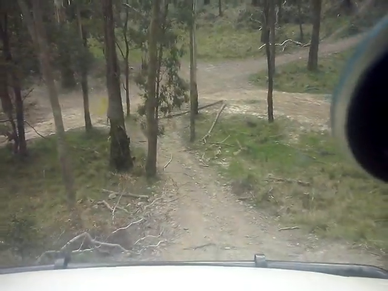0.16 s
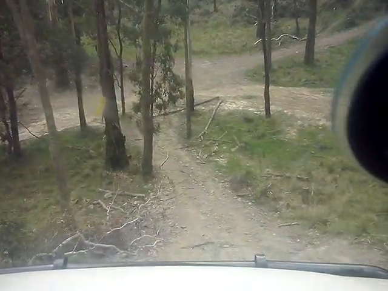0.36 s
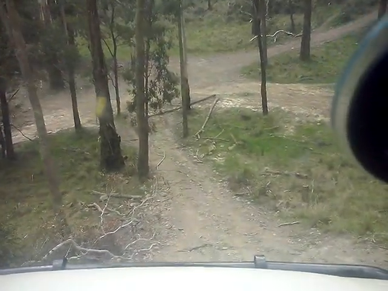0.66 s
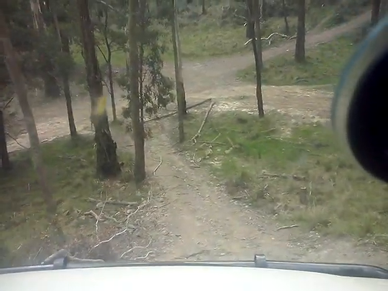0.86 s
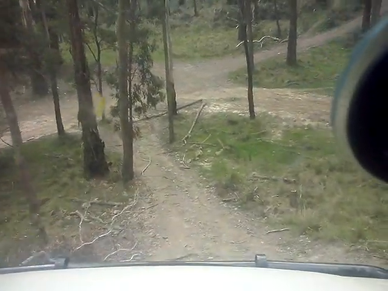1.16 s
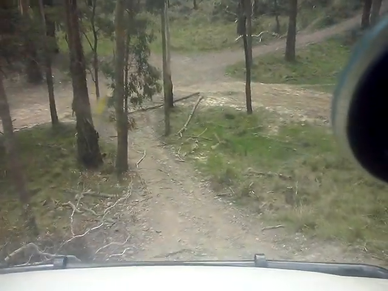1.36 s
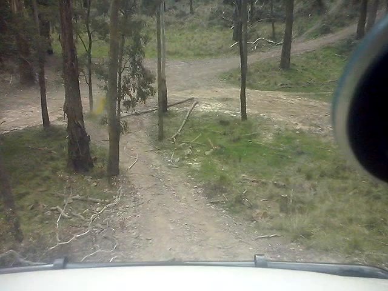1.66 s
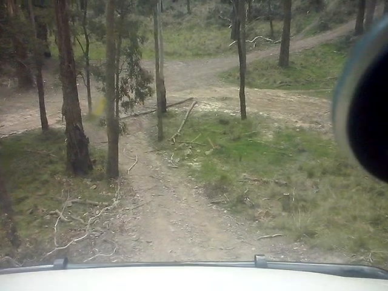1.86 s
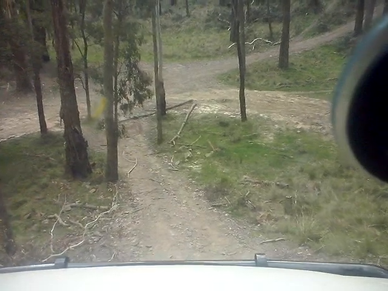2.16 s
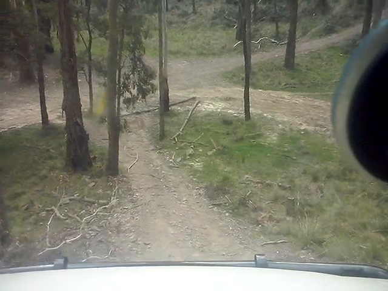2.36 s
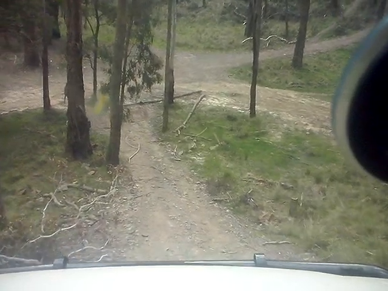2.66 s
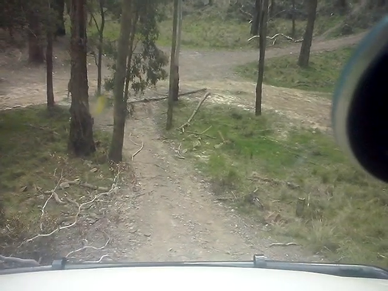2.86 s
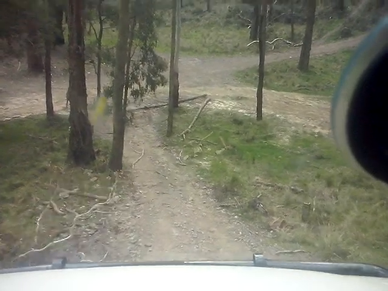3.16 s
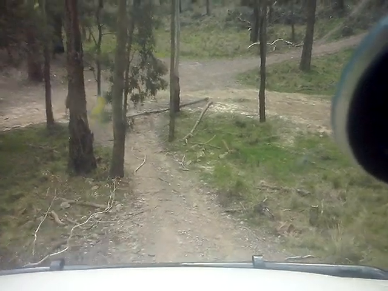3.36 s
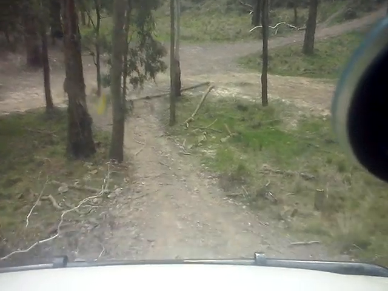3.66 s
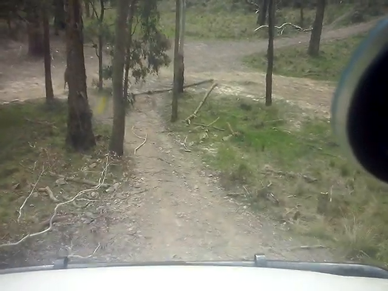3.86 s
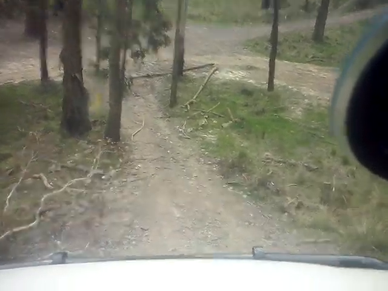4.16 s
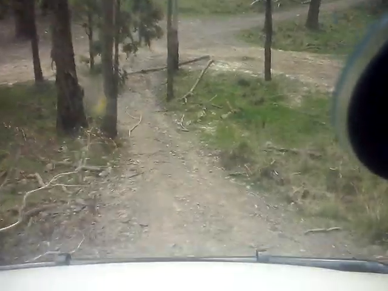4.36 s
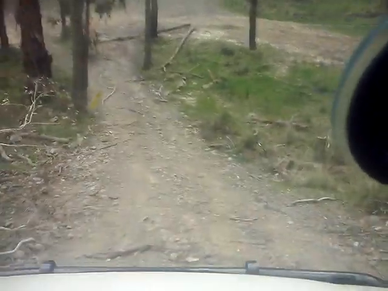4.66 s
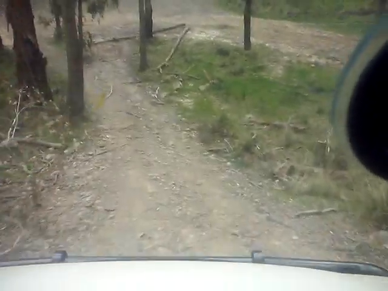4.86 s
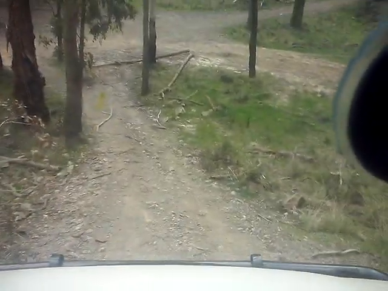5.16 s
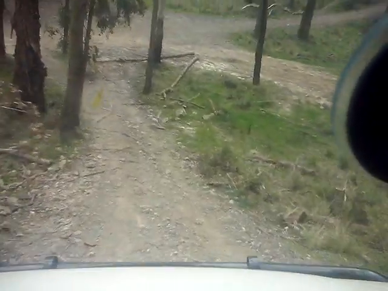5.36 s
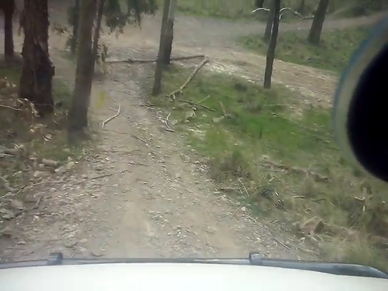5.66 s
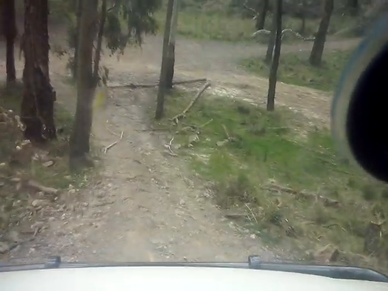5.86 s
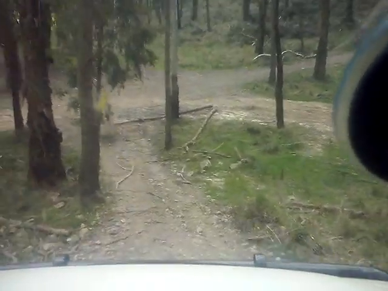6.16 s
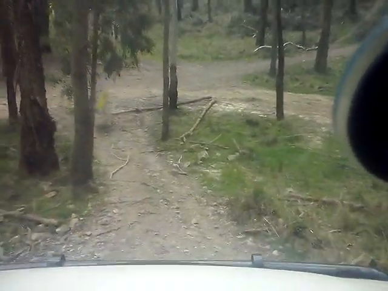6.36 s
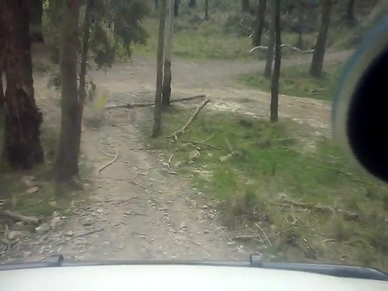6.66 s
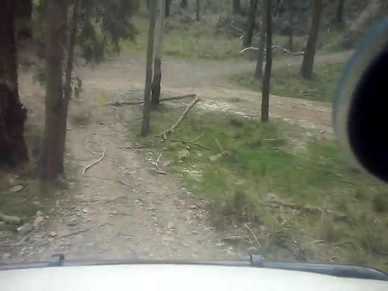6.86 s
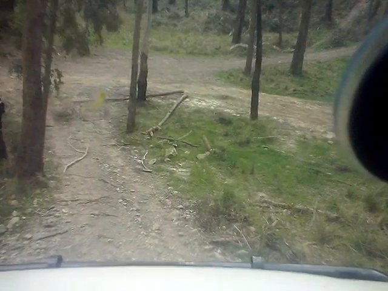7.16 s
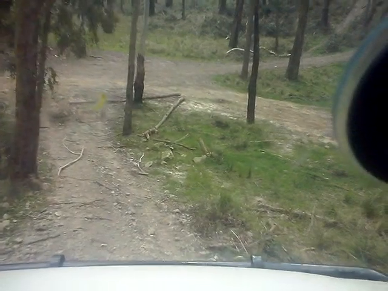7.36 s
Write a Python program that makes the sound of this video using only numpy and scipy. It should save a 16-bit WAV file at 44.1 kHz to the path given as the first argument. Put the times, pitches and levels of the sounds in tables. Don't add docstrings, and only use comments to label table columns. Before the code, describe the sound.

Inside a closed vehicle cabin, tyres creep over gravel with trim creaks and faint engine hum, then dry sticks snap loudly and stones crunch.

```python
import sys
import numpy as np
from scipy import signal
from scipy.fft import rfft, irfft, next_fast_len
from scipy.io import wavfile
from scipy.ndimage import map_coordinates

SR = 44100
rng = np.random.default_rng(int(sys.argv[2]) if len(sys.argv) > 2 else 0)


def store_wav(level_fs):
    pcm = np.round(np.clip(np.atleast_2d(level_fs), -1, 1) * 32767)
    wavfile.write(sys.argv[1], SR, pcm.T.astype(np.int16))


def linear_from_db(decibels):
    return 10 ** (np.asarray(decibels, float) / 20)


N = 330750


def unit(x):
    return x / np.sqrt(np.mean(x ** 2) + 1e-20)


def along(points, hz):
    f, value = np.transpose(points)
    return np.interp(np.log(hz + 1), np.log(f + 1), value)


def curves(rows):
    s, *columns = np.transpose(rows)
    return [np.interp(np.arange(N) / SR, s, column) for column in columns]


def wobble(rate):
    knots = rng.standard_normal(int(N * rate / SR) + 4)
    return map_coordinates(knots, [np.arange(N) * rate / SR])


def filtered(x, response):
    m = next_fast_len(N + SR // 2)
    return irfft(rfft(x, m) * response(np.fft.rfftfreq(m, 1 / SR)), m)[..., :N]


def coloured(x, spectrum):
    closed = [(0.76, -120)] + spectrum + [(SR / 2, -120)]
    return unit(filtered(x, lambda hz: linear_from_db(along(closed, hz))))


def modes(peaks):
    def response(f):
        total = 0
        for k, (centre, width, db) in enumerate(peaks):
            damping = 1j * f * width
            total = total + (-1) ** k * linear_from_db(db) * damping / (centre * centre - f * f + damping)
        return total
    return response


def add(track, s, sound):
    part = track[max(round(s * SR), 0):][:len(sound)]
    part += sound[:len(part)]


def swells(rows):
    power = np.zeros(N)
    for s, length, db in rows:
        t = np.arange(max(-3 * length, -s), 3 * length, 1 / SR)
        add(power, s + t[0], linear_from_db(2 * db) * np.exp(-2 * (2 * t / length) ** 2))
    return power


def heaped(base_db, rows, lean):
    tilted = [(s, length, db + lean * tilt) for s, length, db, tilt in rows]
    return 10 * np.log10(linear_from_db(2 * base_db) + swells(tilted))


def grains(chance, spread_db, t60):
    size_db = spread_db * np.minimum(rng.exponential(size=N), 3)
    sizes = (rng.random(N) < chance) * linear_from_db(size_db)
    puff = linear_from_db(-60 * np.arange(SR // 20) / SR / t60)
    return unit(signal.fftconvolve(sizes, puff)[:N] * rng.standard_normal(N))


# t/s, level/dB
ROLL = [(0, -49), (.3, -44.5), (.45, -51.5), (.9, -53.5), (1.4, -52.5), (1.8, -48.5), (2.3, -51),
        (3.15, -51.5), (3.5, -51.5), (4.15, -47), (4.4, -42), (5.1, -37), (5.5, -40.5), (5.85, -43.5),
        (6.2, -40.5), (6.5, -41.5), (6.62, -48), (6.85, -53.5), (7.5, -47)]
# centre t/s, length/s, level/dB, coarseness/dB (big stones crunch, small hiss)
PATCHES = [(.06, 0.32, -45, -17), (0.198, 0.11, -37.5, -4.5), (.31, 0.026, -40.5, -8), (1.9, 0.16, -49, -3),
           (3.29, 0.13, -46.5, 7), (3.63, 0.26, -43, -0.5), (3.76, 0.13, -45.5, 0), (4.02, 0.14, -64, -7),
           (4.45, 0.14, -33, 2.5), (4.54, 0.13, -37.5, -6), (4.622, 0.032, -29.5, 2),
           (4.7, 0.063, -29.5, -7.5), (4.788, 0.14, -27, -1), (4.956, 0.14, -27, 4), (5.22, 0.26, -41, 4),
           (5.299, 0.12, -31.5, -3), (5.381, 0.086, -33.5, -13), (5.7, 0.12, -33.5, -5),
           (5.94, 0.22, -40, -4), (6.273, 0.13, -30, -5), (6.421, 0.16, -29.5, -2), (7.419, 0.047, -41, -7)]
# centre t/s, level/dB, depth/dB (deep ones rumble, shallow ones drum)
RUTS = [(.15, -43, -5), (1.6, -46, 0), (2, -45.5, 6), (2.6, -49, -14), (3.31, -36.5, 5), (3.37, -54, 8),
        (3.63, -38.5, 13.5), (3.76, -41, -7), (4.02, -39.5, 10), (4.33, -34, 3), (4.44, -38, 10),
        (4.65, -32, -2), (4.79, -27, 4), (4.96, -29, -12.5), (5.27, -36, 7), (5.38, -36, -15),
        (5.7, -40, 0), (6.07, -42, 14), (6.27, -34, -4), (6.42, -36, -0.5), (7.42, -46.5, -8)]
# f/Hz, level/dB
GRIT = [(2400, -5.5), (3200, -3), (4200, -1.5), (5500, 0.5), (6600, 2.5), (9000, -6)]
# f/Hz, level/dB
CRUNCH = [(600, -16.5), (900, -5.5), (1450, 1), (2000, -5), (3000, -7), (4000, -17)]
# f/Hz, level/dB
BODY = [(130, -8), (190, -1), (230, -1.5), (330, -3.5), (550, -8), (900, -15), (1300, -15.5)]
# f/Hz, level/dB
RUMBLE = [(20, -45), (36, -19), (50, -0.5), (80, -2), (125, -1), (170, -21)]
CRUNCH_DB, BODY_DB, RUMBLE_DB = 1, 1.96, 0.5
RUT_S = 0.21


def tyres():
    roll_db, = curves(ROLL)
    ruts = [(s, RUT_S, db, depth) for s, db, depth in RUTS]
    grit_db = heaped(roll_db, PATCHES, lean=-0.62)
    crunch_db = heaped(roll_db + CRUNCH_DB, PATCHES, lean=0.71)
    body_db = heaped(roll_db + BODY_DB, ruts, lean=-0.3)
    rumble_db = heaped(roll_db + RUMBLE_DB, ruts, lean=0.26)
    stones = grains(chance=300 / SR, spread_db=2.5, t60=0.014)
    stones = stones * np.clip((roll_db + 65.5) / 16, .3, 1)
    hiss = rng.standard_normal((4, N))
    shared = 1.3 * wobble(35)
    grit = linear_from_db(grit_db + shared + 0.32 * wobble(4.7)) * coloured(0.99 * stones + hiss[0], GRIT)
    lumps = coloured(0.5 * stones + hiss[1], CRUNCH) + 0.59 * pebbles(count=800, cycles=106, spread_db=8)
    crunch = linear_from_db(crunch_db - 1.5 + shared + 1.1 * wobble(18)) * lumps
    body = linear_from_db(body_db + 0.54 * shared + 1.13 * wobble(13)) * coloured(hiss[2], BODY)
    rumble_gain = linear_from_db(rumble_db - 2.5 + 0.21 * shared + 2.05 * wobble(15.0))
    return grit + crunch + body + rumble_gain * coloured(hiss[3], RUMBLE)


def pebbles(count, cycles, spread_db):
    out, t = np.zeros(N), np.arange(SR // 40) / SR
    for when, pitch, size in rng.random((count, 3)):
        hz = 600 * 7 ** pitch
        envelope = linear_from_db(spread_db * size - 60 * t * hz / cycles) * (1 - np.exp(-t / 0.00042))
        add(out, when * N / SR, envelope * np.sin(2 * np.pi * hz * t))
    return unit(out)


# t/s, peak level/dB, ring f/Hz
CRACKS = [
    (4.325, 3, 5580),
    (4.3819, 1, 4950),
    (4.5931, 1, 5540),
    (4.7259, 2, 5310),
    (6.2041, .8, 5650),
    (6.2509, .5, 5250),
    (6.3091, 0, 5410),
]
# t/s, peak level/dB, ring f/Hz
SNAPS = [(3.2261, -13, 6820), (3.5366, -14.5, 7070), (3.9382, -22, 3480), (4.0797, -20, 3767),
         (4.1903, -7.5, 5700), (4.6299, -7.5, 5330), (4.6616, -4, 6220), (4.687, -15, 5280),
         (4.781, -5.5, 5880), (5.0185, -2.5, 6730), (5.1178, -15.5, 6660), (5.144, -12.5, 5570),
         (5.2238, -5, 3930), (5.2602, -10.5, 3700), (5.3148, -16, 3340), (5.3842, -6.5, 3000),
         (5.548, -7, 6370), (6.1832, -5.5, 5050), (6.2725, -15, 6190), (6.4815, -11, 6770),
         (7.2461, -15, 6220)]
# t/s, peak level/dB, ring f/Hz
CHIPS = [(1.5656, -17.5, 5970), (1.7919, -3, 6700), (2.535, -20, 3870), (2.586, -17.5, 3420),
         (3.5598, -16, 6900), (3.9801, -27, 5750), (4.3617, -4.5, 6070), (4.4113, -8.5, 6330),
         (4.6458, -7.5, 6470), (4.7394, -11.5, 3600), (4.8085, -5, 5180), (4.8682, -3.5, 6760),
         (5.0515, -17, 6100), (5.1568, -13, 6193), (5.925, -7, 6100), (6.51, -23, 4900), (7.388, -10, 4600)]
# t/s, peak level/dB, ring f/Hz, dull click level/dB
KNOCKS = [(0.5053, -33, 4540, -7), (1.6385, -24.5, 6470, -6), (1.756, -39, 3170, -3),
          (2.798, -24.5, 3950, -1.5), (3.588, -9, 5680, -1), (3.609, -16.5, 3540, 1.5),
          (3.6296, -22, 5190, 1), (4.062, -20, 3340, -5), (4.1901, -16.5, 3550, 8), (4.3021, -8, 6470, 2),
          (4.4709, -17.5, 5190, -16), (4.501, -21.5, 4000, 3.5), (4.764, -5.5, 6100, -15),
          (4.955, -22, 3100, -3), (4.977, -9, 5100, -2.5), (5.4514, -17, 5088, 2), (5.774, -23.5, 5294, 0),
          (5.8181, -41, 2960, 15.5), (6.068, -32, 5280, -3), (6.298, -18.5, 5130, 3.5),
          (6.425, -17.5, 6310, -5)]
# t/s, peak level/dB, ring f/Hz
TICKS = [(1.1141, -30, 6300), (1.1962, -29.5, 6490), (1.588, -18, 5800), (1.6125, -22, 3130),
         (1.6406, -20, 2860), (1.7564, -30, 2870), (1.8207, -18, 6070), (1.896, -26.5, 3180),
         (1.9074, -26, 4700), (1.9439, -24, 5430), (4.3145, -21, 5200), (4.3575, -21, 6000),
         (4.7955, -17, 4970), (3.437, -32, 6640), (2.1377, -25, 5900), (2.1716, -28, 6440),
         (2.3446, -24.5, 6670), (2.4923, -44, 4260), (3.4833, -27.5, 3870), (4.0221, -28, 2710),
         (4.0456, -28, 6330), (4.1791, -32, 5750), (4.3413, -12, 5120), (4.4004, -33, 5260),
         (4.4428, -3, 5700), (4.4598, -12, 5200), (4.6638, -10, 5860), (4.6917, -2.5, 5100),
         (4.7054, -17, 5430), (4.7333, -10, 5170), (4.8195, -10, 6660), (4.8743, -6.5, 6330),
         (4.9876, -15, 6750), (5.0314, -4, 5620), (5.065, -13, 6330), (5.0762, -20, 5800),
         (5.1138, -11, 5470), (5.1198, -16, 6400), (5.1523, -18, 6150), (5.177, -13.5, 6290),
         (5.1824, -23, 5900), (5.2473, -22, 4260), (5.3202, -15, 3340), (5.3353, -23, 5350),
         (5.3515, -13, 2714), (5.3701, -14.5, 6100), (5.3901, -5.5, 2940), (5.3974, -14, 6440),
         (5.4067, -15, 3660), (5.4534, -11.5, 5150), (5.907, -32, 5970), (5.9801, -3, 4260),
         (5.9898, -13.5, 3850), (6.2582, -17, 4900), (6.4573, -7, 6200), (7.0197, -31, 6140),
         (7.0896, -33, 6560), (7.2534, -10.5, 6150), (7.3688, -19, 6680), (7.415, -20, 5340)]
# t/s, peak level/dB, ring f/Hz
SPLINTERS = [(.3702, -29, 6700), (.445, -32, 5800), (.939, -38, 3933), (1.431, -27, 5470),
             (1.5397, -29, 7040), (1.99, -23, 3220), (2.6137, -19.5, 5440), (4.233, -22.5, 3640),
             (4.842, -19, 3330), (5.8419, -26, 3810), (5.8663, -28, 3620), (7.151, -27, 6440),
             (7.3589, -27, 6560)]
# t/s, peak level/dB, f/Hz
CLICKS = [
    (2.0799, -15, 3840),
    (2.0923, -11, 4100),
    (2.1014, -26, 5240),
    (2.117, -9, 3850),
]
CHIP_DULL_DB, SNAP_DULL_DB, TWIG_DULL_DB = -40, -12, -7.5
TICK_DULL_DB, SLIP_DULL_DB = -8, -12
SPLIT_S, CLEAN_S, CRACK_S, CLICK_S = .0003, .00017, .00036, .00009
CRACK_CLEAN = .5
CLEAN_TAIL_DB = -8
SLIP_DB = -5


def snaps():
    ring, tail, dull = np.zeros((3, N))
    t = np.arange(SR // 20) / SR
    fade = np.clip(t / .002, 0, 1) ** 2 * linear_from_db(-60 * t / .018)
    slipping = [(s, db + SLIP_DB, hz) for s, db, hz in CREAK]
    # rows, dull click dB, clean share, bright length s
    kinds = [(CHIPS, CHIP_DULL_DB, 0, SPLIT_S),
             (SNAPS, SNAP_DULL_DB, 0, SPLIT_S),
             (CRACKS, SNAP_DULL_DB, CRACK_CLEAN, CRACK_S),
             (SPLINTERS, TWIG_DULL_DB, 0, SPLIT_S),
             (TICKS, TICK_DULL_DB, 1, CLEAN_S),
             (slipping, SLIP_DULL_DB, 1, CLEAN_S),
             (CLICKS, SNAP_DULL_DB, 1, CLICK_S)]
    breaks = [(*row, 0, SPLIT_S) for row in KNOCKS]
    breaks += [(*row, *kind) for rows, *kind in kinds for row in rows]
    for s, db, hz, dull_db, clean, short in breaks:
        swing = np.exp(-.5 * ((t - .0016) / short) ** 2)
        scatter = fade * linear_from_db(clean * CLEAN_TAIL_DB)
        noise = rng.standard_normal((2, len(t)))
        near_hz = hz * (1 + 0.12 * noise[0, :3, None])
        near = np.sin(2 * np.pi * near_hz * t + noise[1, :3, None]).sum(axis=0)
        cycles = np.sin(2 * np.pi * hz * t)
        if short == CRACK_S:
            cycles = cycles + .28 * np.sin(1.1 * np.pi * hz * t)
        add(ring, s - .001, linear_from_db(db) * (1.1 * swing * cycles + linear_from_db(-16) * scatter * near))
        add(tail, s - .001, linear_from_db(db - 8.5) * (.12 * swing + scatter) * noise[0])
        add(dull, s - .001, linear_from_db(db + dull_db + 10.5) * (0.58 * swing + 1.1 * scatter) * noise[1])
    bright = modes([(3330, 14000, 2.9), (6440, 2900, 16.5)])
    muffled = modes([(1700, 2900, -3.5), (3000, 2000, -1.0)])
    return ring + filtered(tail, bright) + filtered(dull, muffled)


# t/s, length/s, t60/s, level/dB, dull part level/dB
BURSTS = [(1.366, 0.076, 0.068, -48.5, -6), (1.537, 0.064, 0.24, -35.5, -5.5),
          (1.752, 0.058, 0.081, -41, -3), (2.512, 0.035, 0.32, -31, -9), (2.491, .006, 0.09, -43, -21),
          (3.22, 0.0076, 0.46, -40.5, 4), (3.583, 0.007, 0.019, -19, -11), (3.929, 0.022, 0.056, -36, -8),
          (3.976, 0.0064, 0.05, -35.5, -16), (4.057, 0.011, 0.053, -34, -2.5),
          (4.079, 0.0054, 0.059, -33.5, -9), (1.985, 0.043, .03, -47, 5), (4.748, 0.038, 0.06, -20.5, -7),
          (6.442, 0.013, 0.027, -26, -12), (4.855, 0.017, 0.21, -26, -29), (5.02, 0.011, 0.0088, -13, -13),
          (5.363, 0.031, 0.14, -24, -2.5), (5.664, 0.017, 0.034, -22, -4),
          (5.673, 0.023, 0.071, -4.5, -24.5), (6.48, 0.008, 0.04, -25.5, -0.5),
          (7.127, 0.041, 0.043, -46, -4), (7.378, 0.011, 0.041, -22.5, -7.5)]
RISE_SHARE = .35


def bursts():
    t, high, low = np.arange(SR // 2) / SR, np.zeros(N), np.zeros(N)
    for s, length, t60, db, dull_db in BURSTS:
        rise = np.clip(t / (RISE_SHARE * length), 0, 1) ** 2
        shape = rise * linear_from_db(db - 60 * np.maximum(t - length, 0) / t60)
        add(high, s, shape)
        add(low, s, shape * linear_from_db(dull_db))
    dense = grains(chance=6000 / SR, spread_db=1.2, t60=.006)
    dull = filtered(dense, modes([(1440, 1600, 0.0), (2300, 76, -0.6)]))
    return high * coloured(dense, GRIT) + low * unit(dull)


# t/s, peak level/dB, f/Hz
PINGS = [(0.503, -36.5, 1370), (1.432, -38, 1330), (1.779, -31, 1300), (1.895, -36, 1432), (2.0, -32, 1660),
         (2.588, -25, 3440), (3.5366, -21.5, 3000), (3.226, -28, 1291), (3.829, -37, 1270),
         (3.945, -46, 1207), (4.5, -12.5, 1360), (4.51, -22, 1062), (4.548, -24, 1470), (4.645, -21, 1400),
         (4.663, -19, 2050), (4.739, -12.5, 2470), (4.776, -14.5, 1425), (4.774, -13, 2520),
         (5.018, -16, 2300), (5.031, -23, 1580), (5.153, -24.5, 1840), (5.225, -18.5, 1520),
         (5.261, -21, 1130), (5.372, -18, 1193), (5.604, -29.5, 1060), (5.677, -15, 2410),
         (5.816, -27.5, 2070), (5.841, -31, 2206), (5.924, -26, 1354), (5.989, -42, 1300),
         (6.079, -26, 2040), (6.254, -36, 2520), (6.298, -14.5, 1440), (6.388, -19, 1440),
         (6.45, -20, 2320), (6.526, -33, 1098), (7.406, -40, 1803)]
PING_T60_S = .018


def pings():
    out, t = np.zeros(N), np.arange(SR // 20) / SR
    for s, db, hz in PINGS:
        pitch, phase = rng.normal(size=(2, 3, 1))
        cluster = np.sin(2 * np.pi * hz * np.exp(.13 * pitch) * t + 3 * phase).sum(axis=0)
        envelope = linear_from_db(db + 4 - 60 * t / PING_T60_S) * (1 - np.exp(-t / .001))
        add(out, s, envelope * (np.sin(2 * np.pi * hz * t) + .6 * cluster))
    return out


# t/s, peak level/dB, f/Hz
THUDS = [(1.79, -27, 99), (2.514, -52, 101.6), (3.219, -24.5, 256), (3.222, -28, 89.7), (3.28, -30, 329),
         (3.259, -41, 103), (3.517, -24.5, 560), (3.732, -28, 340), (3.924, -26, 157), (4.297, -23, 112),
         (4.363, -13.5, 383), (4.598, -20, 129), (4.735, -15, 337), (4.68, -22, 95), (4.784, -18, 150),
         (4.893, -12.5, 257), (4.928, -9, 227), (4.962, -18, 199), (4.998, -13.5, 256), (5.217, -22.5, 243),
         (5.369, -8, 198), (5.674, -23, 209.4), (5.913, -21, 106.5), (5.988, -20, 316), (6.273, -15, 499),
         (6.391, -21, 264), (6.478, -23, 804), (7.234, -26.5, 108)]
THUD_T60_S = 0.12


def thuds():
    out, t = np.zeros(N), np.arange(SR // 5) / SR
    for s, db, hz in THUDS:
        pitch, phase = rng.normal(size=(2, 14, 1))
        boom = np.sin(2 * np.pi * hz * np.exp(.4 * pitch) * t + 3 * phase).sum(axis=0)
        add(out, s, linear_from_db(db - 12.5 - 60 * t / THUD_T60_S) * (1 - np.exp(-t / 0.0035)) * boom)
    return out


def slips(rate, jitter, spread_db):
    turns = np.cumsum(rate * (1 + jitter * wobble(70))) / SR
    released = np.diff(np.floor(turns), prepend=0) > 0
    return released * linear_from_db(spread_db * rng.standard_normal(N))


# t/s, peak level/dB, ring f/Hz
CREAK = [(0.0046, -22, 3560), (0.0153, -19, 3780), (0.0265, -14.5, 5850), (0.0377, -23, 5000),
         (0.0461, -26, 5080), (0.056, -28, 2950), (0.064, -19, 5200), (0.076, -23, 5640),
         (0.0845, -25, 5510), (0.0946, -27, 5630), (0.1035, -22, 5640), (0.111, -16, 4450),
         (0.1197, -14, 4800), (0.127, -9.5, 5600), (0.1332, -10, 5730), (0.1406, -16, 5700),
         (0.1479, -7.5, 6530), (0.157, -18, 3160), (0.168, -15, 4310), (0.1786, -18, 5340),
         (0.187, -16, 5900), (0.194, -21, 4340), (0.201, -10, 7030), (0.2087, -12, 6160),
         (0.2178, -23, 6100), (0.2263, -15, 4700), (0.2433, -31, 5860), (0.2486, -36, 6370),
         (0.2628, -28, 3060), (0.2686, -24, 5700), (0.2736, -35, 5630), (0.2834, -18, 5740),
         (0.29, -17, 5750), (0.2993, -29, 3040), (0.308, -12, 6400), (0.312, -20, 5700), (0.322, -13, 6700),
         (0.3277, -11.5, 6700), (0.3333, -28, 6130), (0.3442, -30, 5700)]
# f/Hz, width/Hz, level/dB
TRIM = [(3050, 300, 1), (4300, 400, -2), (5700, 450, 0), (6800, 400, -1)]
# centre t/s, length/s, level/dB
RUBS = [
    (.17, 0.11, -42.5),
    (2.6, 0.085, -36),
]
# start t/s, end t/s, slip rate/Hz, f/Hz, level/dB
SQUEAKS = [
    (.625, .73, 355, 3700, -49.5),
    (.73, .78, 90, 3750, -53),
    (1.0, 1.11, 90, 3800, -51.5),
    (.93, 1.0, 45, 3800, -55),
    (2.205, 2.36, 150, 3250, -48),
    (2.39, 2.46, 150, 3250, -50),
    (2.53, 2.62, 250, 3500, -42),
    (1.535, 1.62, 150, 3300, -42),
]
# t/s, length/s, f/Hz, level/dB
CHIRPS = [
    (1.113, .04, 2950, -48),
    (2.945, .025, 3350, -50),
    (3.365, .018, 3000, -43),
    (7.158, .016, 2100, -40),
    (7.138, .014, 2050, -46),
]
TRIM_DB = 17


def creaks():
    releases = np.zeros(N)
    for s, db, hz in CREAK:
        add(releases, s + .0006, linear_from_db([db + TRIM_DB]))
    scrape = np.sqrt(swells(RUBS)) * unit(filtered(rng.standard_normal(N), modes(TRIM)))
    out = filtered(releases, modes(TRIM)) + scrape
    t, shake = np.arange(N) / SR, wobble(140)
    for start, end, per_s, hz, level_db in SQUEAKS:
        gate = np.clip(np.minimum(t - start, end - t) / 0.0086, 0, 1)
        joint = modes([(.48 * hz, 350, -4), (.78 * hz, 300, -6), (hz, 280, 2),
                       (1.17 * hz, 250, -5), (2 * hz, 900, -9)])
        jitter = .02 + .25 * (100 / per_s) ** 2
        rasp = slips(per_s, jitter, spread_db=2)
        out = out + gate * linear_from_db(level_db) * unit(filtered(rasp, joint))
    for s, length, hz, level_db in CHIRPS:
        done = np.clip((t - s) / length, 0, 1)
        swell = np.sin(np.pi * done)
        phase = 2 * np.pi * np.cumsum(hz * (.96 + .08 * done + 0.015 * shake)) / SR
        out = out + swell * linear_from_db(level_db + 3 * shake) * np.sin(phase)
    return out


# t/s, firing f/Hz, level/dB
IDLE = [(0, 93.9, -57), (.35, 95.8, -46.5), (.65, 97.3, -47.5), (1, 96.4, -53), (1.3, 91, -55),
        (1.74, 92.3, -52), (1.81, 94.6, -34.5), (2.0, 96.7, -43), (2.1, 96.8, -38.5), (2.48, 97.2, -55),
        (2.55, 95, -36), (2.7, 97.8, -44.5), (3.15, 99.1, -58), (3.3, 87.9, -60), (3.6, 96.3, -39.5),
        (3.85, 94.7, -53), (4.1, 99.5, -47), (6.3, 87.9, -40), (6.75, 92, -50), (7.5, 91.6, -46)]
# multiple of the firing rate, level/dB
ORDERS_DB = [(.5, -9), (1, 0.5), (1.5, -11), (2, -9), (3, -16), (3.5, -19)]


def engine():
    hz, db = curves(IDLE)
    phase = 2 * np.pi * np.cumsum(hz * (1 + .003 * wobble(12))) / SR
    out = np.zeros(N)
    for order, level_db in ORDERS_DB:
        out += linear_from_db(db + level_db + 1.8 * wobble(8)) * np.sin(order * phase + order)
    return np.sqrt(2) * out


# centre t/s, length/s, f/Hz, level/dB
DRONES = [
    (3.04, 0.73, 140, -55),
    (7.75, 1.7, 120, -52),
    (6.94, 2, 190, -52.5),
    (.06, 0.27, 500, -50.5),
    (.68, .12, 690, -58.5),
]


def drones():
    t, out = np.arange(N) / SR, np.zeros(N)
    for s, length, hz, db in DRONES:
        gain = np.sqrt(2 * swells([(s, length, db)])) * linear_from_db(1.9 * wobble(14))
        out += gain * np.sin(2 * np.pi * hz * t + 0.6 * wobble(18))
    return out


# f/Hz, t60/s
CABIN = [(200, 0.11), (1500, 0.12), (7000, 0.05)]


def cabin(x):
    hz, t, z = signal.stft(rng.standard_normal(SR // 4), SR, nperseg=128)
    decay = linear_from_db(-60 * t / along(CABIN, hz)[:, None])
    tail = signal.istft(z * decay, SR, nperseg=128)[1]
    return signal.fftconvolve(np.pad(x, (120, 0)), tail / np.linalg.norm(tail))[:N]


def scene():
    sharp = snaps() + bursts() + creaks() + pings()
    steady = tyres() + thuds() + engine() + drones()
    return (sharp + linear_from_db(-11.0) * cabin(sharp) + steady)[None]


# f/Hz, level/dB
RECORDER = [(6500, -2.5), (7000, -4.5), (7450, -12.5), (7800, -31), (8000, -47), (8300, -30), (8900, -28.5),
            (9400, -53.5), (10000, -100)]
CLIP = .72
TOP_HZ = 16900
AIR_DB_PER_KHZ = 1.2


def low_pass(x):
    return signal.sosfilt(signal.butter(12, 16970, fs=SR, output="sos"), x)


def record(dry):
    narrow = filtered(dry, lambda hz: linear_from_db(along(RECORDER, hz)) * (hz < 10000))
    clipped = np.clip(narrow, -CLIP, CLIP)

    def air(hz):
        edge = np.clip((TOP_HZ - hz) / 1200, 0, 1)
        return edge * linear_from_db(-AIR_DB_PER_KHZ * np.maximum(hz / 1000 - 10, 0))
    mix = filtered(clipped, air)
    return low_pass(mix)


dry = scene()
out = record(dry)
store_wav(out)
```